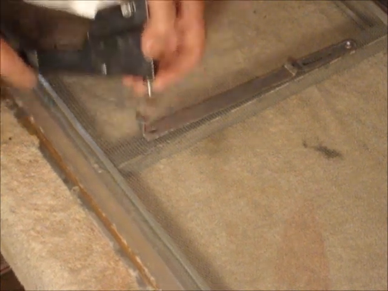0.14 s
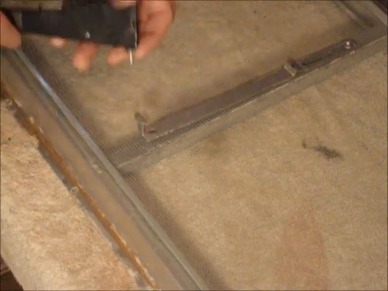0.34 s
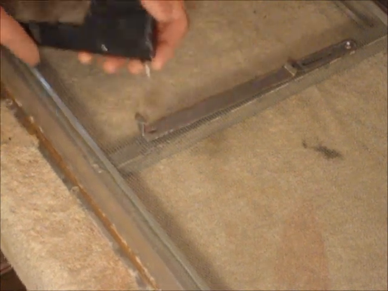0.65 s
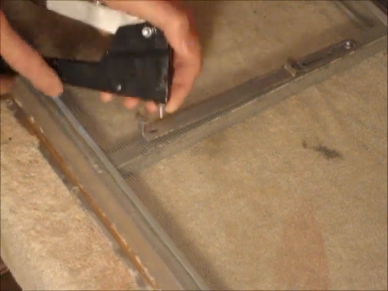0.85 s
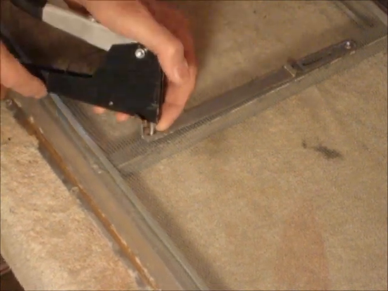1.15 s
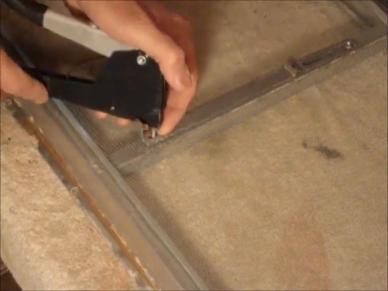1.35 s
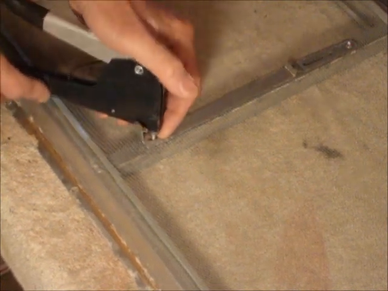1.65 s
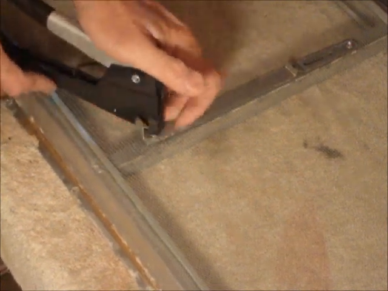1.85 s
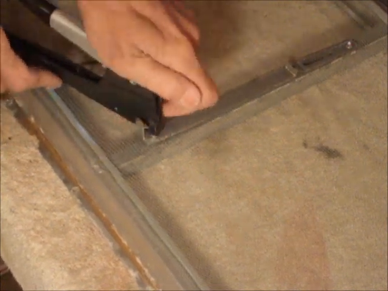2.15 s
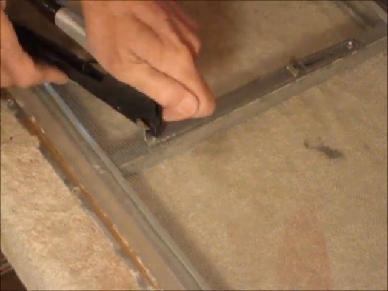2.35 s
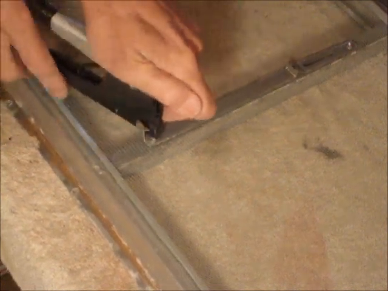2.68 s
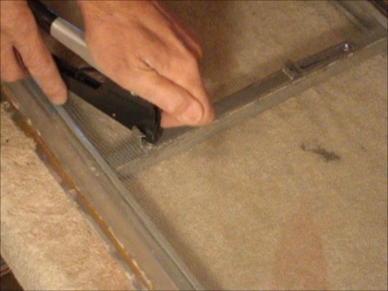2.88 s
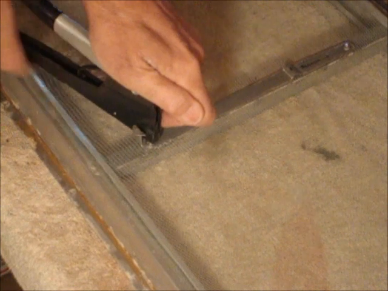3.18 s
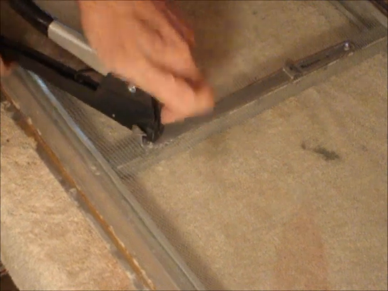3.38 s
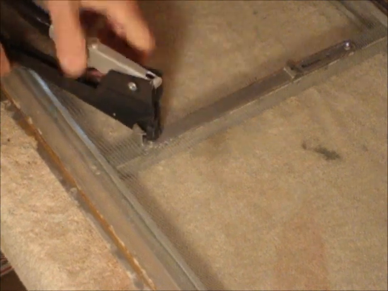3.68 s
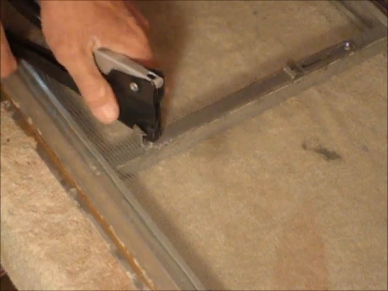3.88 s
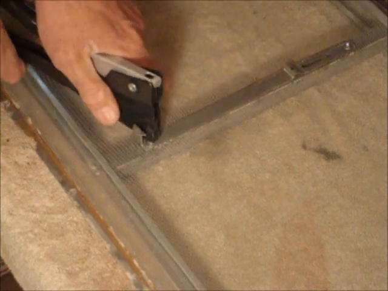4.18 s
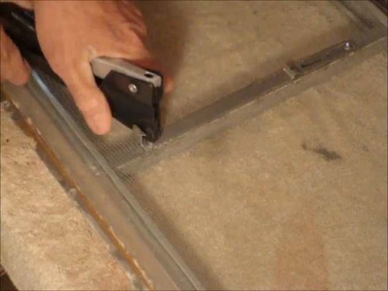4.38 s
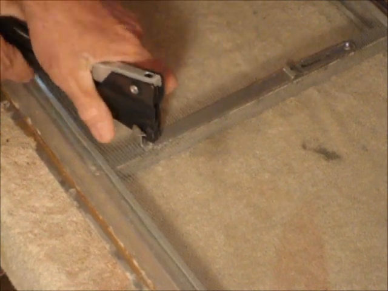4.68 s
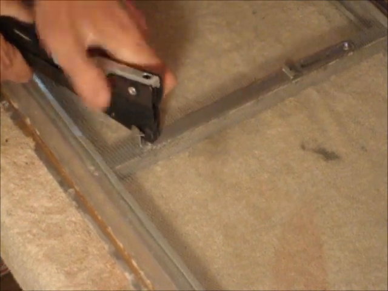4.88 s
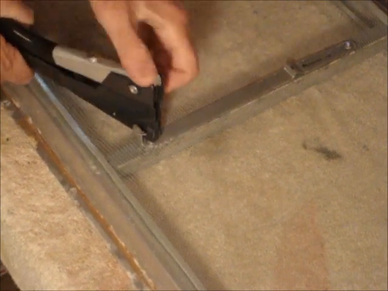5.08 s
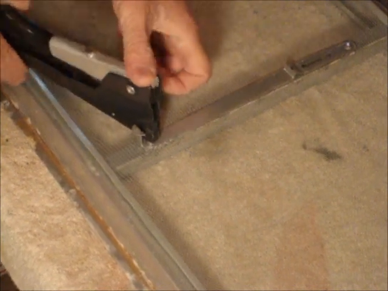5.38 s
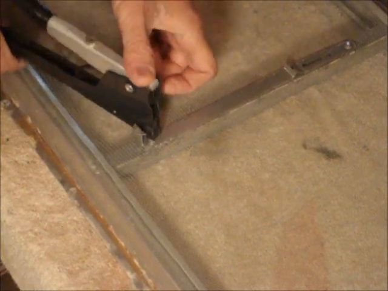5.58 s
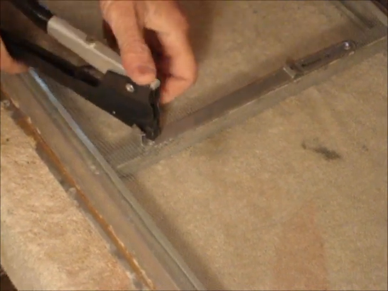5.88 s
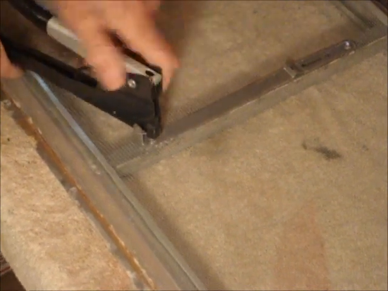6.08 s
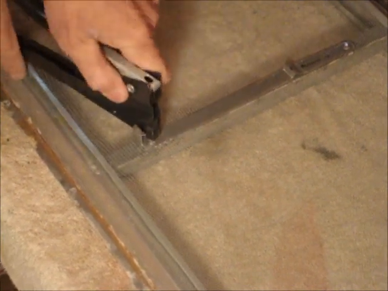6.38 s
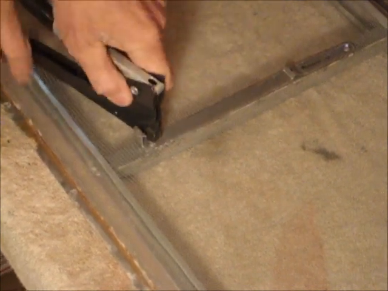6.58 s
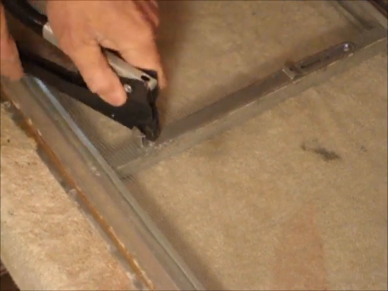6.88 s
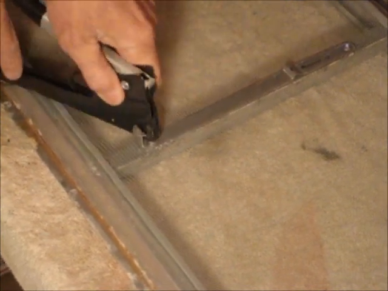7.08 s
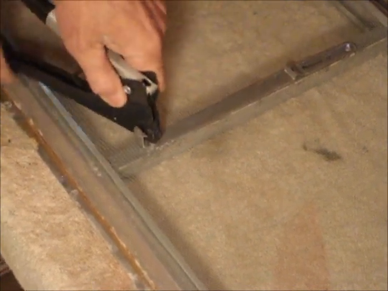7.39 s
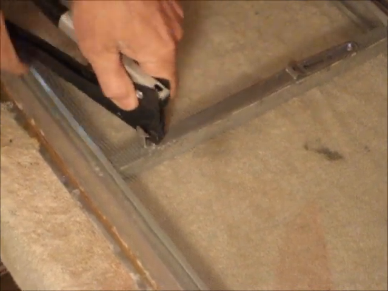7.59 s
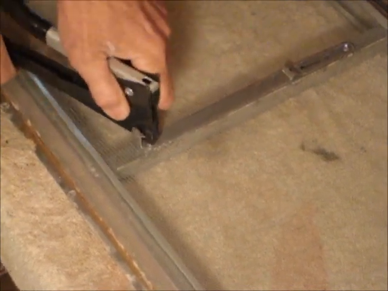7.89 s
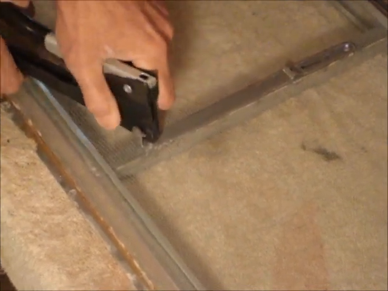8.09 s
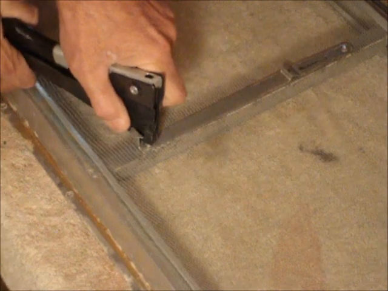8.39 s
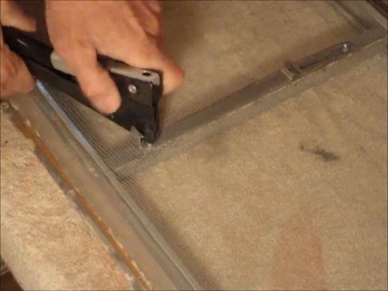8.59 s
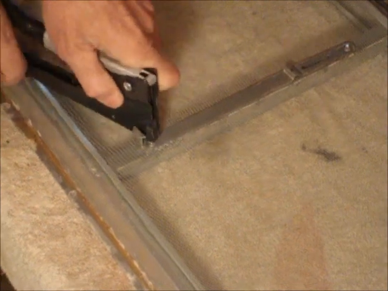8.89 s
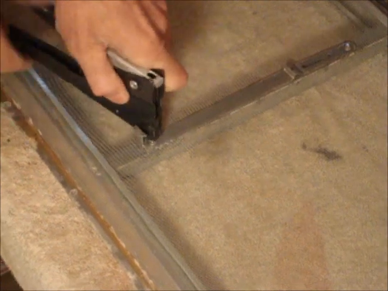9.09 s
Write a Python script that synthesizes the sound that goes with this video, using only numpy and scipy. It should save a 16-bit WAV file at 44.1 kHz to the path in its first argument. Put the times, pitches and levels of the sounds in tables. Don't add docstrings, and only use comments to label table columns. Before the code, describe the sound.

A close microphone in a small carpeted room hears steady soft hiss, a low wavering hum near 580 Hz and a thin high whine. After about a second of only that, a rivet tip touches a light metal frame at 1.15 s with a small bright ring, seating at 1.2. A firmer nose strike clanks at 1.93, and a crisp handle snap follows at 2.5. At 2.86 the first hard squeeze bursts: a tenth of a second of crowded, loud cracks with a dull floor thud. From 3 to 6 s there are sparse faint knocks, tiny spring tings and a clearer click at 5.6. Small scrapes come at 6.1 and 6.5, a tick at 6.67, then the second squeeze at 7.04, sharp but lighter, with a bright snap at 7.35. Irregular steel ticks, low taps and finger rubs continue, with a double snap at 8.3 and a clear tick at 9.0.

```python
import sys
import numpy as np
from scipy import signal
from scipy.fft import rfft, irfft
from scipy.io import wavfile
from scipy.ndimage import map_coordinates

SR = 44100
rng = np.random.default_rng(int(sys.argv[2]) if len(sys.argv) > 2 else 0)


def output_pcm(signal):
    pcm = np.clip(np.atleast_2d(signal).T, -1, 1) * 32767
    wavfile.write(sys.argv[1], SR, np.round(pcm).astype(np.int16))


def voltage_ratio(decibels):
    exponent = np.asarray(decibels, float) / 20
    return 10 ** exponent


N = 407925

# [t/s, peak level/dB, brightness/dB, t60/s]
SQUEEZES = [(2.858, -11, 2.5, .088), (2.866, -9, -6, .073), (2.874, -7.5, -3, .062),
            (2.887, -6.5, -30, .041), (2.893, -12, -16, .079), (2.903, -9, -12, .065),
            (2.916, -11.5, -10, .091), (2.927, -15, -12, .04), (2.948, -20, -5, .06), (7.034, -30, 8, .14),
            (7.041, -22.5, -2, .07), (7.047, -12.5, -10, .11), (7.054, -11, -16, .08),
            (7.072, -15.5, -19, .09), (7.104, -30, 9, .11), (7.137, -33, -4, .062)]
# [t/s, peak level/dB, brightness/dB, t60/s]
SNAPS = [(1.16, -40.5, 4, .36), (1.215, -36, 1, .16), (1.932, -24, 5, .18), (2.511, -19.5, 7, .059),
         (2.523, -25, -14, .12), (1.575, -51, 9, .17), (3.081, -51, 6, .12), (4.948, -48, 3, .06),
         (5.417, -46, 5, .05), (5.74, -49, 6, .14), (6.112, -45, 7, .072), (6.468, -42, 8, .11),
         (7.344, -25, 1, .28), (8.287, -29, 2.5, .15), (8.313, -29, -18, .32)]
# [t/s, peak level/dB, brightness/dB, t60/s]
SCRAPES = [
    (6.115, -35.5, 2, .26),
    (6.46, -29, -1, .24),
    (7.15, -47, 11, .45),
    (7.21, -38, 3, .37),
    (8.735, -41, -2, .36),
]
# [f/Hz, width/Hz, level/dB]
TOOL_MODES = [(447, 500, 7.5), (1110, 140, 4), (1700, 110, -6.5), (2270, 10, -66), (2540, 10, -19),
              (2800, 23, -41), (3350, 9.3, -28), (3470, 9, -27)]
# [t/s, level/dB, contact/s, free ring/s]
TIP_HITS = [
    (1.158, -35.5, 0.0016, 0.1),
]
SEAT_HITS = [
    (1.215, -32, 0.0035, 0.062),
    (1.248, -35.5, 0.0028, 0.033),
]
BLOW_HITS = [
    (1.931, -18.5, 0.0021, 0.023),
    (1.939, -20, 0.0028, .075),
]
# [f/Hz, t60/s, tip level/dB, seating level/dB, nose blow level/dB]
FRAME_MODES = [(809, 0.36, -5, -3.5, -24), (1180, 0.23, -9, 0.5, -16), (1590, .2, -27, -7, -22),
               (1920, 0.12, -12, 2, -1), (1954, 0.39, -30, -12, -4), (2477, 0.056, -1, -7, -3),
               (2640, 0.055, 1, -3, 2), (2920, 0.078, -15, -7, -12), (3058, 0.14, 2, 0, 4),
               (3740, 0.23, -21, -20, -14), (4870, 0.066, -12, -19, -16), (5095, 0.091, -7, -12, -9),
               (6030, 0.085, -5, -15, -22), (7130, .15, -14, -28, -29), (6700, 0.14, -8, -22, -20),
               (7100, 0.19, -12, -24, -25), (8460, 0.16, -1, -28, -25), (9000, .12, -20, -32, -32),
               (9900, 0.099, -22, -36, -31)]
# [t/s, peak level/dB, ring f/Hz]
KNOCKS = [(1.147, -43, 2670), (1.57, -40, 2040), (2.247, -39, 1220), (2.703, -35.5, 990),
          (2.837, -33, 2550), (3.081, -44, 1160), (3.396, -40, 1600), (4.677, -43, 1080), (4.945, -43, 847),
          (5.597, -30.5, 1500), (5.611, -38, 1620), (5.659, -39, 956), (5.735, -42, 1360),
          (6.519, -32, 1970), (7.573, -37, 2640), (7.596, -35, 720), (8.402, -35.5, 2390),
          (8.457, -44, 1110), (8.788, -36, 1730), (8.901, -45, 665), (8.936, -37, 854)]
# [t/s, peak
# level/dB, ring f/Hz]
TINKS = [(1.305, -40, 1180), (1.366, -32, 1170), (1.385, -36, 1200), (2.31, -49, 848), (7.047, -15, 1110),
         (4.688, -33, 1770), (4.709, -44, 1690), (6.209, -33, 1030), (6.67, -22, 760), (6.681, -30, 1700),
         (7.629, -33.5, 985), (7.729, -32.5, 703), (7.898, -27, 810), (8.172, -25, 785), (8.194, -33, 740),
         (8.213, -35, 836), (8.239, -35, 790), (8.532, -33, 1000), (8.82, -24, 793), (8.848, -33, 692),
         (8.992, -21.5, 1564), (9.018, -40, 1800), (9.195, -39, 680)]
# [t/s, peak level/dB, ring f/Hz]
LOW_TICKS = [
    (3.399, -50, 557),
    (5.312, -46, 460),
    (5.438, -31, 442),
    (5.81, -34, 440),
    (6.742, -30, 467),
    (7.552, -32, 452),
    (7.915, -38, 700),
    (7.969, -36, 450),
    (8.878, -29, 556),
    (9.215, -31, 541),
]
# [t/s, peak level/dB, ring f/Hz]
RUBS = [
    (1.584, -45, 930),
    (6.699, -37.5, 824),
    (8.499, -39, 790),
    (8.744, -38, 990),
    (9.074, -41, 700),
    (9.089, -32, 1110),
    (9.162, -32, 720),
]
# [t/s, f/Hz, level/dB, length/s]
PINGS = [(2.865, 2540, -24, .016), (4.08, 4120, -58, .091), (4.675, 3850, -54, .026),
         (4.69, 1780, -49, .056), (4.83, 1780, -54, .05), (5.057, 4130, -58, .05), (6.073, 4110, -44, .032),
         (6.111, 1750, -44, .02), (6.205, 3360, -54, .088), (6.66, 4110, -51, .035),
         (6.886, 2070, -52, .06), (7.216, 1760, -43, .08), (7.345, 2158, -35, .035),
         (8.226, 4060, -60, .04), (8.535, 1790, -46, .058)]
# [t/s, level/dB, f/Hz, t60/s]
THUDS = [
    (2.861, -33, 170, .13),
    (2.88, -20, 245, .12),
    (2.92, -16, 440, .1),
    (7.042, -35, 130, .11),
    (7.051, -33.5, 247, .2),
    (7.28, -46, 450, .2),
    (7.35, -41, 400, .25),
    (7.55, -50, 220, .15),
    (8.292, -41, 310, .2),
]
# [f/Hz, t60/s]
ROOM_DECAY = [(100, 0.44), (400, 0.25), (1500, 0.31), (8000, 0.21)]
# [f/Hz, level/dB per Hz]
HISS_COLOUR = [(15, -60), (25, -33.5), (131, -14), (317, -5.5), (524, -6), (580, -7), (709, -8.5),
               (1140, -10), (2370, -16.5), (3050, -16), (3290, -18), (3820, -19), (6490, -20.5),
               (7730, -22), (10200, -26), (13300, -66), (22000, -120)]
# [f/Hz, rms level/dB]
WHINES = [(990.5, -69), (2859, -70.5), (2918, -82.5), (2977, -74), (3036, -77), (3095, -61), (3445, -74.5),
          (4102, -74.5), (5722, -73), (5782, -73.5), (5835, -77), (6885, -75), (7558, -79), (7590, -66),
          (7617, -83), (7860, -72)]
# [hit t/s, length/s, above f/Hz]
DROPOUTS = [
    (1.158, .02, 4600),
    (1.932, .003, 5000),
    (2.512, .006, 1800),
    (2.839, .008, 1000),
    (2.857, .018, 3000),
    (6.112, .006, 4500),
    (7.034, .029, 2200),
    (7.345, .013, 2300),
    (8.286, .018, 2800),
]


def evened(x):
    return x / np.sqrt(np.mean(x ** 2) + 1e-20)


def read(points, hz):
    f, value = np.transpose(points)
    return np.interp(np.log(hz + 1), np.log(f + 1), value)


def add(mix, s, sound):
    part = mix[round(s * SR):][:len(sound)]
    part += sound[:len(part)]


def band(x, lo_hz, hi_hz):
    sos = signal.butter(2, [lo_hz, hi_hz], "band", fs=SR, output="sos")
    return evened(signal.sosfilt(sos, x))


def slow(per_s):
    points = rng.standard_normal(400)
    at = np.arange(0, N + 64, 64)
    curve = map_coordinates(points, [at / SR * per_s], order=3)
    return np.interp(np.arange(N), at, evened(curve))


def burst(rise, t60, hold=0.):
    t = np.arange(round(.45 * SR)) / SR
    rise, t60 = max(rise, 3e-4), max(t60, .01)
    fall_db = -60 * np.maximum(t - rise - hold, 0) / t60
    return np.sin(np.pi / 2 * np.minimum(t / rise, 1)) ** 2 * voltage_ratio(fall_db)


def rattle(clicks_per_s, spread_db):
    strength = voltage_ratio(spread_db * np.minimum(rng.exponential(1, N), 4))
    clicks = strength * (rng.random(N) < clicks_per_s / SR)
    puffs = signal.lfilter([1], [1, -.97], clicks)
    return evened((1.5 + puffs) * rng.standard_normal(N))


def snaps(chatter):
    hz = np.fft.rfftfreq(N, 1 / SR)
    modes = sum(voltage_ratio(db - 6.5) / np.hypot(1, 2 * (hz - f) / width) for f, width, db in TOOL_MODES)
    body = irfft(rfft(chatter) * (1 + modes) / (1 + hz / 2070.0), N)
    bass, middle, upper, treble = (np.zeros(N) for _ in range(4))
    for rows, rise in ((SNAPS + SQUEEZES, .002), (SCRAPES, .025)):
        for s, peak_db, bright_db, t60 in rows:
            bass_db = -13 - .5 * bright_db
            upper_db = 3 + .6 * bright_db
            add(bass, s, voltage_ratio(peak_db + bass_db - 8) * burst(rise + 0.0086, 0.96 * t60))
            add(middle, s, voltage_ratio(peak_db - 10) * burst(rise + 0.0014, t60))
            add(upper, s, voltage_ratio(peak_db + upper_db - 9) * burst(rise, .9 * t60, hold=.005))
            add(treble, s, voltage_ratio(peak_db + bright_db - 9) * burst(rise, .85 * t60, hold=.006))
    low = bass * band(body, 320, 650) + middle * band(body[::-1], 650, 1500)
    high = upper * band(body, 1500, 3500) + treble * band(body[::-1], 3500, 11000)
    return low + high


def frame(column, hits):
    t = np.arange(round(.45 * SR)) / SR
    out = np.zeros(N)
    buzz = 2.2 * slow(40.)
    for s, level_db, contact, free in hits:
        chance = rng.random((len(FRAME_MODES), 3))
        sound = np.zeros(len(t))
        for (hz, t60, *dbs), (a, b, split) in zip(FRAME_MODES, chance):
            twin_hz = hz * (1 + .04 * (split - .5))
            twin = .35 * np.sin(2 * np.pi * (twin_hz * t + b))
            pair = np.sin(2 * np.pi * (hz * t + a)) + twin
            build = .011 * min(1, (1100 / hz) ** 2)
            buzz_db = np.roll(buzz, round(a * N))[:len(t)]
            sound += voltage_ratio(dbs[column] + buzz_db) * burst(contact + build, t60) * pair
        damped_db = np.clip(900. * (t - free), 0, 12.0)
        add(out, s, voltage_ratio(level_db - damped_db) * sound)
    return out


def ticks(chatter):
    out = np.zeros(N)
    knock = band(chatter, 450, 2800)
    scratch = band(chatter, 3000, 11000)
    # table, treble/dB, knock/dB, rise/s, t60/s of a tick at -35 dB
    kinds = ((KNOCKS, -13, 3.5, .0025, .11), (TINKS, -22, -10, .0025, .13),
             (LOW_TICKS, -21, -11, .0025, .13), (RUBS, -15, -2.4, .012, .13))
    for rows, treble_db, knock_db, rise, t60 in kinds:
        for s, peak_db, hz in rows:
            shape = burst(rise, t60 * np.exp(-.035 * (peak_db + 35)))
            at = slice(round(s * SR), round(s * SR) + len(shape))
            shape = shape[:len(knock[at])]
            tone = np.sin(2 * np.pi * hz * np.arange(len(shape)) / SR)
            ring = .4 * tone + .7 * band(chatter[::-1][at], hz / 1.3, hz * 1.35)
            noise = voltage_ratio(knock_db) * knock[at] + voltage_ratio(treble_db) * scratch[at]
            add(out, s, voltage_ratio(peak_db - 9) * shape * (ring + noise))
    return out


def spring():
    out = np.zeros(N)
    flutter = slow(40.07)
    for s, hz, level_db, length in PINGS:
        t = np.arange(round(length * SR)) / SR
        tone = np.sin(2 * np.pi * hz * t) * signal.windows.tukey(len(t), .5)
        add(out, s, voltage_ratio(level_db) * tone)
    return out * voltage_ratio(3.3 * flutter)


def thuds(chatter):
    out = np.zeros(N)
    t = np.arange(round(.45 * SR)) / SR
    rumble = .1 * band(band(chatter, 55, 130), 45, 150)
    for s, level_db, hz, t60 in THUDS:
        at = slice(round(s * SR), round(s * SR) + len(t))
        tone = .8 * np.sin(2 * np.pi * hz * t)
        rough = band(chatter[at], hz / 1.4, hz * 1.4)
        deep = rumble[at] * min(1, 180 / hz) ** 2
        add(out, s, voltage_ratio(level_db) * burst(0.0091, t60) * (tone + rough + deep))
    return out


def room(x):
    out = np.zeros(N)
    turn = 2 * np.pi * 9 * np.arange(N) / SR
    at = np.arange(250, SR // 2 - 20, 20)
    for k in range(3):
        taps = np.zeros(SR // 2)
        taps[at + rng.integers(0, 20, len(at))] = rng.choice([-1., 1.], len(at))
        hz, t, z = signal.stft(taps, SR, nperseg=256)
        decay = voltage_ratio(-60 * t / read(ROOM_DECAY, hz)[:, None])
        tail = signal.istft(z * decay, SR, nperseg=256)[1]
        share = np.sqrt(2 / 3) * np.cos(turn + 2 * np.pi * k / 3)
        out += signal.fftconvolve(x * share, tail / np.linalg.norm(tail))[:N]
    return out


def camera():
    hz = np.fft.rfftfreq(N, 1 / SR)
    t = np.arange(N) / SR
    hiss = evened(irfft(rfft(rng.standard_normal(N)) * voltage_ratio(read(HISS_COLOUR, hz)), N))
    hum_hz = 583.6 + 1.45 * slow(25.)
    hum_db = -53 + 0.96 * slow(5.7)
    hum = voltage_ratio(hum_db) * np.sin(2 * np.pi * np.cumsum(hum_hz) / SR)
    whine = np.zeros(N)
    for f, db in WHINES:
        whine_db = db + 3.5 + 0.5 * slow(7.2)
        whine += voltage_ratio(whine_db) * np.sin(2 * np.pi * (f * t + rng.random()))
    hiss_db = -50 + .3 * slow(3.)
    return voltage_ratio(hiss_db) * hiss + hum + whine


def scene():
    chatter = rattle(clicks_per_s=1500, spread_db=2.5)
    rings = sum(frame(k, hits) for k, hits in enumerate((TIP_HITS, SEAT_HITS, BLOW_HITS)))
    knocks = snaps(chatter) + ticks(chatter) + thuds(chatter)
    thin = rings + spring()
    echoes = voltage_ratio(-5.5) * room(knocks + thin / 2)
    return (knocks + thin + echoes + camera())[None]


def roll_off(x):
    return signal.sosfilt(signal.butter(12, 11330, fs=SR, output="sos"), x)


def record(dry):
    limited = .92 * np.tanh(dry[0] / .92)
    hz, t, z = signal.stft(limited, SR, nperseg=256, noverlap=192)
    keep = np.ones(z.shape)
    for hit, length, above_hz in DROPOUTS:
        end = hit - .003
        keep[np.ix_(hz > above_hz, (t > end - length) & (t < end))] = 0
    power = signal.lfilter([.01], [1, -.99], (abs(z) ** 2).sum(0))
    odds = .02 + .07 * (power > 8 * np.median(power))
    patches = rng.random((len(hz) // 3 + 1, len(t) // 8 + 1))
    chance = np.kron(patches, np.ones((3, 8)))[:len(hz), :len(t)]
    treble = hz > 4500
    keep[treble] *= (chance > odds)[treble]
    patchy = signal.istft(z * keep, SR, nperseg=256, noverlap=192)[1][:N]
    edge = signal.firwin(401, 10040, window=("kaiser", 7), fs=SR)
    mix = signal.oaconvolve(patchy, edge, "same")[None]
    return roll_off(mix)


dry = scene()
out = record(dry)
output_pcm(out)
```